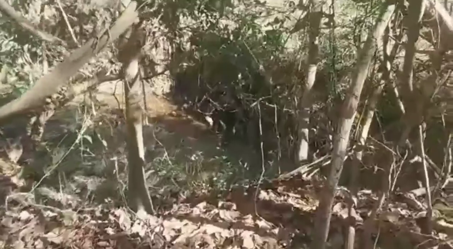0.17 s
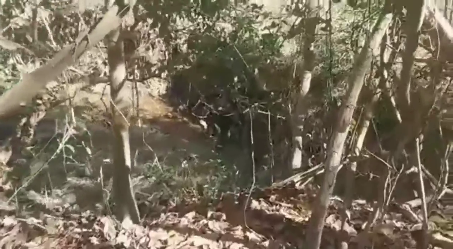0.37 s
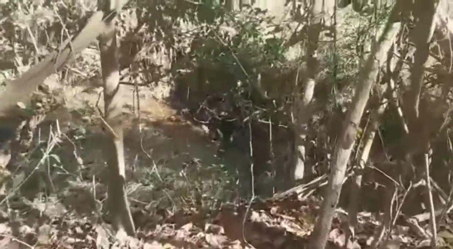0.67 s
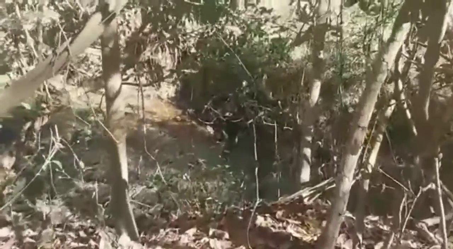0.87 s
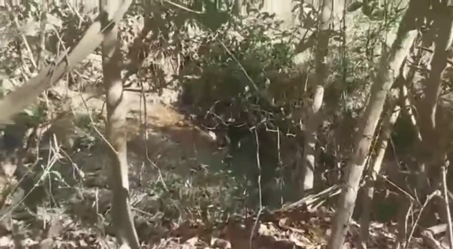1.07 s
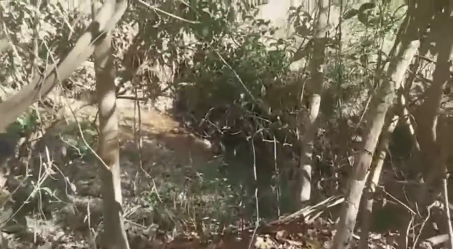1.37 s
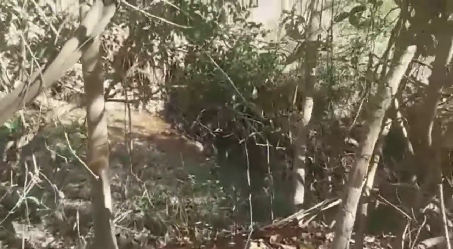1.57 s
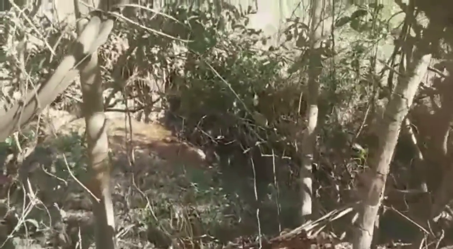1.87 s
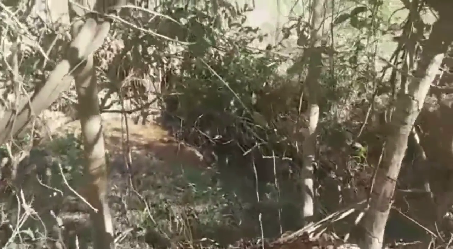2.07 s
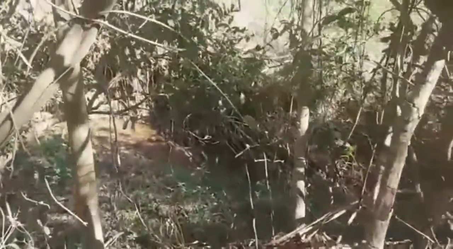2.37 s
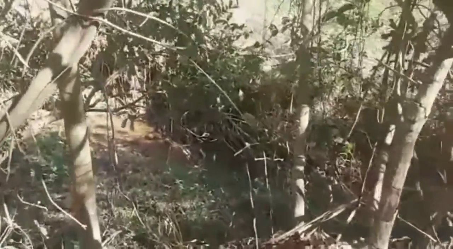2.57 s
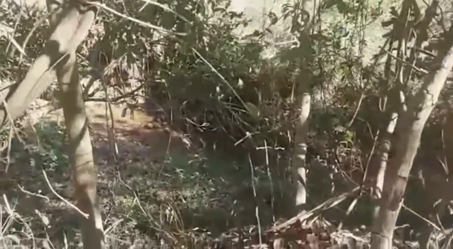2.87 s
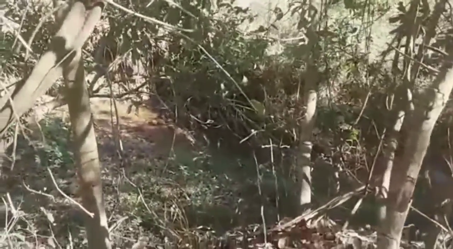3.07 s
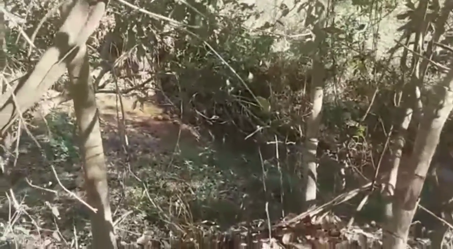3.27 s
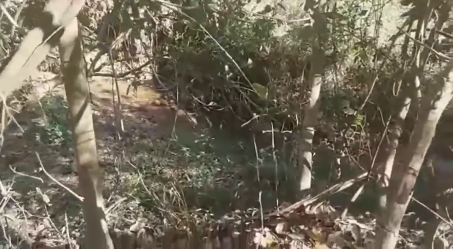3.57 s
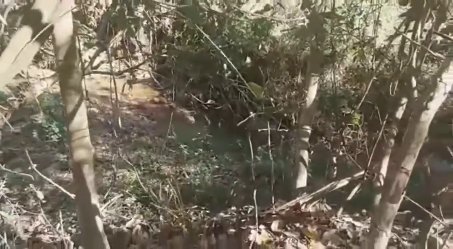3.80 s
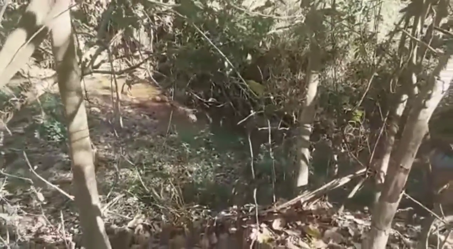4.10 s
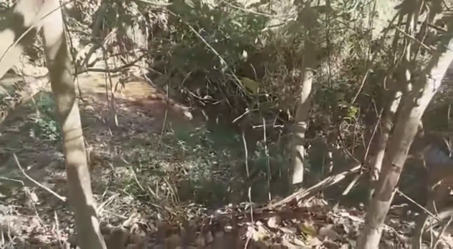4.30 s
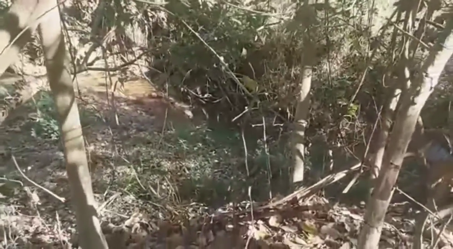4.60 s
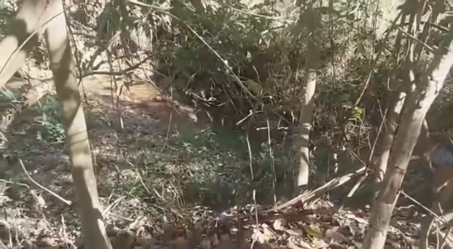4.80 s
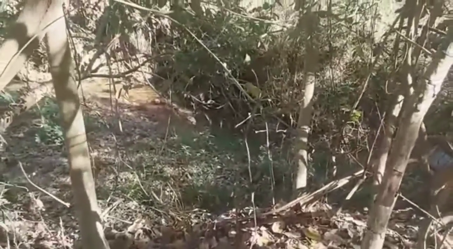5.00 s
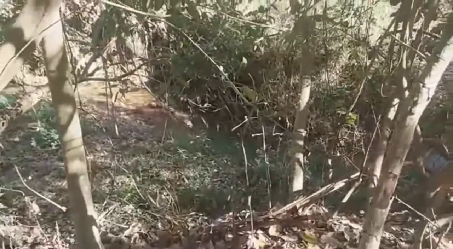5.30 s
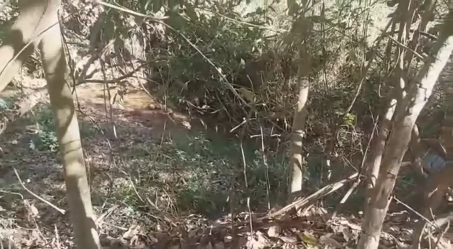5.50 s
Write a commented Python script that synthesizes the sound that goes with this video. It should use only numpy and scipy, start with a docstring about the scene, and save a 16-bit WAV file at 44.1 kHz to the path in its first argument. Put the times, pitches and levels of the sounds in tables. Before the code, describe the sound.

Close outdoor sound in a quiet wood: brittle leaf litter crushes and scrapes underfoot in overlapping, uneven waves, with small sticks clicking and cracking throughout. The walker slows and stops just after four seconds. A few last light ticks give way to grainy fabric rubs in short strokes. Underneath lies a very quiet, slightly low-weighted air hush; there is hardly any reverberation.

```python
"""Dry leaves crunch and twigs snap under slow treads on a forest floor, until the walker stops.
Leaves: random fractures ringing in a bank of resonators, plus friction noise, in three bands.
Twigs: fibre bursts exciting knock, ring and splinters. Soft thuds: short, low sine pulses.
Near the stop, clothing swishes as grainy filtered noise. A quiet hush of shaped noise runs throughout;
trunk echoes and a short scattered tail follow the leaves and twigs."""
import sys
import numpy as np
from scipy import signal
from scipy.fft import rfft, irfft
from scipy.io import wavfile

SR = 44100
rng = np.random.default_rng(int(sys.argv[2]) if len(sys.argv) > 2 else 0)


def transcribe(u):
    """Save the signal u as a 16-bit wav file named by the first command-line argument.

    u: samples, shape (n,) or (channels, n), limited to [-1, 1]; the rate is SR.
    q: integer samples, one column per channel.
    """
    v = np.clip(np.atleast_2d(u).T, -1, 1)
    q = np.round(v * 32767).astype(np.int16)
    wavfile.write(sys.argv[1], SR, q)


N = 249165  # samples


def from_db(db):
    """Amplitude ratio of a level in dB."""
    return 10 ** (np.asarray(db) / 20)


def rms_one(x):
    """Scale to unit rms."""
    return x / np.sqrt(np.mean(x ** 2) + 1e-20)


def drift(rate_hz):
    """Unit-rms random curve: straight lines between rate_hz random knots per second."""
    knots = rng.standard_normal(N // 20)
    return rms_one(np.interp(np.arange(N) / SR * rate_hz, np.arange(len(knots)), knots))


def cut(x, hz, kind, order=2):
    """Butterworth filter."""
    edges_hz = np.clip(hz, 10, .45 * SR)
    sos = signal.butter(order, edges_hz, kind, fs=SR, output="sos")
    return signal.sosfilt(sos, x + 1e-18)


def resonate(x, hz, width_hz):
    """Two-pole resonance; the width sets the damping."""
    r = np.exp(-np.pi * width_hz / SR)
    return signal.lfilter([1 - r, 0, r - 1], [1, -2 * r * np.cos(2 * np.pi * hz / SR), r * r], x + 1e-18)


def colour(x, spectrum):
    """Causal minimum-phase filter with the given gain curve, built from its cepstrum."""
    hz, gain_db = np.transpose(spectrum)
    size = 16384
    bins_hz = np.fft.rfftfreq(size, 1 / SR) + 1
    log_gain = np.log(from_db(np.interp(np.log(bins_hz), np.log(hz), gain_db)))
    cepstrum = irfft(log_gain)[:size // 2]
    cepstrum[1:] *= 2  # fold onto positive time
    response = irfft(np.exp(rfft(cepstrum, size)))
    return signal.fftconvolve(x, response)[:len(x)]


def fractures(per_s, spread_db, largest):
    """Clicks at random moments: many small, a few large."""
    born = rng.random(N) < per_s / SR
    sizes = from_db(spread_db * np.minimum(rng.exponential(1, N), largest))
    return born * sizes * rng.choice([-1, 1], N)


def strokes(rows, attack_s, release_s):
    """Summed power of movements (t/s, hold/s, level/dB) that each rise, hold and die away."""
    t = np.arange(N) / SR
    power = np.full(N, 1e-12)
    for s, hold_s, level_db in rows:
        rise = np.clip((t - s) / attack_s, 0, 1)
        fall = np.exp(-np.maximum(t - s - attack_s - hold_s, 0) / release_s)
        power += (from_db(level_db) * rise * fall) ** 2
    return power


# hush gain curve: [f/Hz, gain/dB]
HUSH = [(25, -24), (42, -15.5), (65, -2), (100, -5), (170, -1), (270, -5.5), (400, -5.5), (650, -10.5),
        (950, -9), (2500, -10.5), (6500, -10), (9000, -22.5), (15500, -17.5)]
HUSH_RMS_DB = -47.5


def wood_hush():
    """Steady background of the wood: noise shaped by HUSH."""
    air = colour(rng.standard_normal(N), HUSH)
    return from_db(HUSH_RMS_DB) * rms_one(cut(air, 41, "high", order=4))


# trunks that throw sound back: [delay/s, level before low-pass/dB]
TRUNKS = [(.0085, -43), (0.0134, -23), (0.029, -27)]


def forest(x):
    """A few near trunks echo; the undergrowth scatters a faint, short tail."""
    at = np.arange(N)
    echoes = sum(from_db(level_db) * np.interp(at - int(s * SR), at, x, left=0) for s, level_db in TRUNKS)
    t = np.arange(SR // 2) / SR
    scatter = rng.standard_normal(len(t)) * from_db(-60 * t / 0.072)  # -60 dB in 72 ms
    tail = signal.fftconvolve(x, scatter / np.sqrt(np.sum(scatter ** 2)))[:N]
    return x + cut(echoes + from_db(-13.5) * tail, 14000, "low")


# cloth gain curve: [f/Hz, gain/dB]
CLOTH = [(100, -32), (350, -6), (680, -12.5), (950, -6), (1200, -9.5), (1650, 1.5), (2700, 1), (3400, -7),
         (4000, -3.5), (4500, 2), (6000, -3.5), (7200, -2.5), (8200, -11.5), (10300, -4), (13500, -16.5)]
# sleeve sliding over jacket: [t/s, hold/s, relative level/dB]
SWISHES = [(4.2, 0.054, -44.5), (4.27, 0.01, -44), (4.39, 0.012, -42.5), (4.53, 0.014, -45),
           (4.57, 0.097, -38.5), (4.775, 0.066, -42), (4.88, 0.032, -34.5), (5.02, 0.087, -48.5),
           (5.13, 0.015, -38.5), (5.19, 0.018, -35), (5.335, 0.14, -39), (5.445, 0.0088, -39.5),
           (5.615, .03, -39.5)]
SWISH_ATTACK_S, SWISH_RELEASE_S = 0.007, 0.085


def clothing():
    """Threads catching on each other merge into a smooth, slightly grainy swish."""
    level_db = 10 * np.log10(strokes(SWISHES, SWISH_ATTACK_S, SWISH_RELEASE_S))
    threads = rms_one(fractures(9000, spread_db=4.0, largest=5.5)) + rng.standard_normal(N)
    flutter_db = 1.1 * drift(70)
    return from_db(level_db + 2.5 + flutter_db) * rms_one(colour(threads, CLOTH))


# shoe meeting soil: [t/s, envelope peak before high-pass/dB, f/Hz]
THUDS = [(1.545, -35, 96), (1.579, -37, 71), (1.767, -36, 72.6), (4.087, -40, 132), (4.097, -41, 70)]


def footfalls():
    """Soft soil answers a shoe with a cycle or two of low thud."""
    out = np.zeros(N)
    for s, level_db, hz in THUDS:
        t = np.maximum(np.arange(N) / SR - s, 0)
        swell = t / 0.004  # envelope peaks after 4 ms
        out -= from_db(level_db) * swell * np.exp(1 - swell) * np.sin(2 * np.pi * hz * t)
    return cut(out, 45, "high")


# a heel or sole presses on the leaves:
# [t/s, hold/s, relative crackle level/dB, muffled crunch re crackle/dB, crisp edges re crackle/dB,
#  friction re fractures/dB]; band trims follow in leaves()
TREADS = [(-0.03, 0.071, -32, -9.5, -2.5, 2.5), (0.135, 0.29, -35.5, -9, -1.5, -2),
          (0.478, 0.16, -37, -6.5, -0.5, -0.5), (0.726, 0.12, -36.5, -13, -2, -2),
          (0.903, 0.02, -35.5, -10, -1.5, 1.5), (1.146, 0.012, -36.5, -4.5, -1, 4),
          (1.268, 0.065, -31.5, -8.5, -2, 8.5), (1.432, 0.037, -31.5, -9, -2, 4.5),
          (1.598, 0.026, -32, -8, 0.5, 2), (1.706, 0.12, -33.5, -8, -2, 0.5),
          (1.883, 0.076, -35, -8.5, 0.5, 1.5), (2.058, 0.016, -33.5, -8.5, -3, 2),
          (2.141, 0.015, -32, -9.5, -2.5, 0), (2.317, 0.062, -42, -13, 1, -7),
          (2.484, 0.024, -38.5, -15, -3, 10), (2.63, 0.32, -41.5, -16, -3.5, 3),
          (2.798, 0.046, -32.5, -9.5, -3, 8.5), (2.97, 0.25, -35.5, -13.5, -4.5, 10.5),
          (3.04, 0.018, -38.5, -9.5, -6, 3), (3.262, 0.091, -34, -7, -2, 0),
          (3.429, 0.026, -35.5, -12, -1.5, 8), (3.589, 0.11, -37, -11, -5, 10),
          (3.804, 0.058, -39, -11.5, -4.5, 13), (3.962, 0.23, -45, -12, -5, 4)]
TREAD_ATTACK_S, TREAD_RELEASE_S = 0.022, 0.14  # weight comes on quickly; crushed leaves settle slowly


def treading():
    """Tread envelopes: crunch, crackle and crisp levels in dB, and friction/fracture amplitude ratio."""
    s, hold_s, level_db, *shares_db = np.transpose(TREADS)
    levels_db = []
    for share_db in [0] + shares_db:
        rows = zip(s, hold_s, level_db + share_db)
        levels_db.append(10 * np.log10(strokes(rows, TREAD_ATTACK_S, TREAD_RELEASE_S)))
    crackle_db, crunch_db, crisp_db, friction_db = levels_db
    return crunch_db, crackle_db, crisp_db, from_db(friction_db - crackle_db)


STALKS_PER_S, STALK_DB, STALK_SPREAD_DB = 24, 4.5, 2.5  # STALK_DB re crackle, before friction cut
STALK_TEAR_S, STALK_HZ, STALK_KNOCK_HZ = 0.00065, 3000, 950  # centres of the random values
STALK_KNOCK_DB, STALK_SPLINTER_DB = -9.5, -2.5  # re ring; the splinter level also varies


def stalks(crackle_db, slide):
    """Small random breaks under the shoe; a sliding shoe breaks them more gently than a crushing one."""
    force_db = crackle_db - 20 * np.log10(np.hypot(1, slide))
    chance = rng.random((400, 2))
    spread = rng.standard_normal((400, 3))
    times = (np.arange(len(chance)) + chance[:, 0]) / STALKS_PER_S
    pitches = 2 ** np.clip(0.31 * spread[:, 0], -1, 1)  # thinner stalks sound higher
    offsets_db = STALK_SPREAD_DB * spread[:, 1:]
    breaks = []
    for s, toughness, pitch, (ring_db, splinter_db) in zip(times, chance[:, 1], pitches, offsets_db):
        if s < N / SR:
            tear_s = STALK_TEAR_S * (.5 + toughness)
            level_db = force_db[int(s * SR)] + STALK_DB + ring_db
            breaks.append((s, tear_s, level_db, STALK_HZ * pitch, STALK_KNOCK_DB,
                           STALK_KNOCK_HZ * pitch, STALK_SPLINTER_DB + splinter_db))
    return breaks


def tear(tear_s, size):
    """A first break, then a dying run of fibres giving way, and the litter shaken around it."""
    t = np.arange(size) / SR
    fibres = rng.standard_normal(size) * (rng.random(size) < .6)
    tearing = np.exp(-t / max(1.67 * tear_s, 1e-4))
    shaken_litter = from_db(-27) * np.exp(-t / 0.0068)
    run = fibres * (tearing + shaken_litter)
    run = run / np.sqrt(np.sum(run ** 2))
    run[0] = np.clip(0.00037 / max(tear_s, 1e-4), 0, 3)  # a quick break spends itself in the first crack
    return run


# splinter resonances: [f/Hz]
SPLINTER_HZ = (7400, 9400)
KNOCK_WIDTH_SHARE = 0.52  # width/f: soft ground damps a knock within a cycle or two
# individual twig breaks: [t/s, tearing time scale/s, ring rms over 5 ms/dB, ring f/Hz,
#  knock re ring/dB, knock f/Hz, splinters re ring/dB]
SNAPS = [(0.002, 0.0056, -20.5, 3400, -4.5, 586, -3.5), (0.0423, 0.0011, -32.5, 3380, -13, 680, -1),
         (0.142, 0.0027, -27, 4160, -6.5, 920, -8), (0.195, 0.00069, -23, 3000, -18, 1150, -9),
         (0.2608, 0.0016, -27.5, 4190, -6.5, 560, -1.5), (0.2969, 0.003, -20.5, 3320, -14.5, 650, -9),
         (0.3452, .0007, -23.5, 2860, -5, 1080, -20), (0.3853, 0.0009, -28.5, 2590, -6.5, 980, -17),
         (0.4093, 0.00025, -19.5, 3300, -20, 660, -15), (0.5116, 0.00036, -25, 2600, -6, 1250, 6),
         (0.6243, 0.0015, -21, 2200, -2.5, 730, -7), (0.6386, 0.00055, -28.5, 3640, -12, 470, 0),
         (0.7093, 0.0052, -28, 2220, -3, 1110, 1.5), (0.7596, 0.0049, -22.5, 3800, -8, 1180, -7),
         (0.7785, 0.00093, -36, 2640, -1, 970, 10), (0.804, .0004, -16.5, 2930, -17, 820, -16),
         (0.847, 0.00065, -20.5, 2400, 2.5, 1060, -9), (0.882, 0.00075, -27.5, 2330, -2.5, 1070, -1),
         (0.9135, 0.0019, -16, 2280, -9.5, 880, -4), (0.9477, 0.0012, -28.5, 3900, -5, 554, -4),
         (0.998, .001, -35, 3950, -9, 460, 1), (1.0354, 0.00082, -30.5, 2280, -16, 920, -5),
         (1.1298, .0012, -36.5, 2360, -7, 600, 0), (1.1728, .0013, -27, 2500, -18, 1010, -3),
         (1.2807, .0005, -25.5, 2560, -5.5, 1250, -12), (1.3652, 0.0025, -21, 3120, -7, 1210, -8.5),
         (1.518, 0.0007, -30, 2770, -18, 704, -4), (1.727, 0.0014, -26, 2570, -5.5, 447, -5),
         (1.8443, 0.0015, -35, 2290, 2.5, 655, -5), (1.89, .0007, -39, 2820, 9.5, 680, -8),
         (1.901, 0.0057, -21, 2530, -7.5, 1190, -7), (1.9505, 0.00018, -19.5, 2290, -24, 1250, -6),
         (2.006, 0.00094, -28, 2660, -7, 1080, 0), (2.035, 0.0016, -19, 2550, -12.5, 1010, -12),
         (2.0823, 0.0015, -23, 4060, -4, 1260, -0.5), (2.1075, 0.0012, -25.5, 4220, -5.5, 800, 3),
         (2.2847, 0.00033, -28.5, 4330, -20, 1250, -3), (2.3688, .0009, -27.5, 2520, -11.5, 1230, -2.5),
         (2.5778, 0.00046, -41, 4300, -3, 1090, 8.5), (2.7697, 0.0057, -28.5, 2880, -4.5, 1240, -7),
         (2.826, 0.00054, -32, 2200, -4, 1250, -19), (2.8993, .0003, -30.5, 3800, -24, 590, 3),
         (3.26, 0.0026, -27, 3700, -8, 696, -12), (3.2798, 0.0012, -17.5, 4570, -14, 870, -7),
         (3.3351, 0.0028, -24, 2670, -7.5, 550, -9), (3.347, .003, -36, 2500, 1.5, 600, -6),
         (3.3805, 0.0014, -16.5, 3400, -13, 580, -2), (3.4192, 0.0022, -26, 4300, -6.5, 960, -9),
         (3.4866, 0.0012, -31.5, 3310, -9, 1250, 1), (3.7713, 0.0019, -30.5, 2550, -4, 840, -1.5),
         (4.0196, .0028, -31.5, 3270, -10, 610, -4), (4.0736, 0.0018, -34, 2550, -19, 1250, -4.5),
         (4.0925, 0.001, -37, 3450, -9, 800, -5), (4.1493, .0017, -34, 3000, -9.5, 520, -3),
         (4.296, 0.0017, -31.5, 2900, -14, 600, -5), (4.3252, .0011, -38.5, 4260, -17.5, 450, -1),
         (5.5688, .0008, -38, 4850, -22, 1240, 2)]


def twigs(breaks):
    """Each break knocks on the ground, rings in the twig and sprays splinters."""
    size = 2048
    window = np.sqrt(.005 * SR / size)  # refers rms to 5 ms
    out = np.zeros(N + size)
    for s, tear_s, ring_db, ring_hz, knock_db, knock_hz, splinter_db in breaks:
        run = tear(tear_s, size)
        crack = colour(run, LEAF)

        recoil = signal.unit_impulse(size) + 1.03 * run  # the whole twig springs back at once
        knock = resonate(recoil, knock_hz, knock_hz * KNOCK_WIDTH_SHARE)
        knock = rms_one(cut(knock, [330, 1800], "band"))

        ring = rms_one(resonate(crack, ring_hz, ring_hz * 0.25))
        ring = ring + from_db(-9.5) * rms_one(cut(crack, [1400, 5000], "band"))
        ring = rms_one(cut(ring, [1300, 6000], "band"))

        splinter = rms_one(sum(resonate(crack, hz, 880) for hz in SPLINTER_HZ))
        splinter = splinter + from_db(10.0) * rms_one(cut(crack, 5000, "high"))
        splinter = rms_one(cut(splinter, 7700, "high"))

        at = max(int(s * SR), 0)
        snap = ring + from_db(knock_db) * knock + from_db(splinter_db) * splinter
        out[at:at + size] += window * from_db(ring_db) * snap
    return out[:N]


# leaf gain curve, also shapes twig cracks: [f/Hz, gain/dB]
LEAF = [(150, -0.5), (300, -3.5), (550, -4.5), (1600, -7.5), (2400, -1), (3200, -6), (4500, -4.5),
        (5800, -10.5), (6950, -0.5), (8000, -7), (9600, -2), (12000, -9.5), (15500, -15)]


def leaves(crunch_db, crackle_db, crisp_db, slide):
    """Tiny fractures ring for a few cycles in leaves of all sizes, over the friction of leaf on leaf."""
    pressure = from_db(.5 * (crackle_db + 37.5))  # more weight breaks more leaves each second
    clicks = fractures(1900 * pressure, spread_db=2.0, largest=6.0)
    count = 18
    dealt = rng.integers(0, count, N)  # each click goes to one leaf size
    rings = 0
    for k, hz in enumerate(np.geomspace(600, 13000, count)):
        rings = rings + np.sqrt(hz) * rms_one(resonate(clicks * (dealt == k), hz, hz * .2))
    breaking = rms_one(rings) + from_db(-10) * rms_one(clicks)
    friction = slide * rng.standard_normal(N)
    grains = (breaking + friction) / np.hypot(1, slide)
    litter = colour(grains * from_db(1.56 * drift(150)), LEAF)  # leaves give way in clumps
    buried = rms_one(cut(litter, [260, 1400], "band", order=3))
    surface = rms_one(cut(litter, [1400, 5500], "band", order=3))
    edges = rms_one(cut(litter, 5350, "high", order=3))
    crunch = buried * from_db(crunch_db - 2.5)
    crackle = surface * from_db(crackle_db - 1.74)
    crisp = edges * from_db(crisp_db - 2.35)
    return crunch - crackle + crisp


def scene():
    """Steps and clothing over the hush of the wood; only leaves and twigs echo."""
    hush = wood_hush()
    crunch_db, crackle_db, crisp_db, slide = treading()
    steps = leaves(crunch_db, crackle_db, crisp_db, slide)
    steps = steps + twigs(SNAPS + stalks(crackle_db, slide))
    return (forest(steps) + footfalls() + clothing() + hush)[None]


def record(dry):
    """Tanh rounds the highest peaks; a steep elliptic low-pass cuts the top."""
    cutoff_hz = 15750
    rounded = 1.2 * np.tanh(dry / 1.2)
    return signal.sosfilt(signal.ellip(12, .1, 80, cutoff_hz, fs=SR, output="sos"), rounded)


dry = scene()
out = record(dry)
transcribe(out)
```